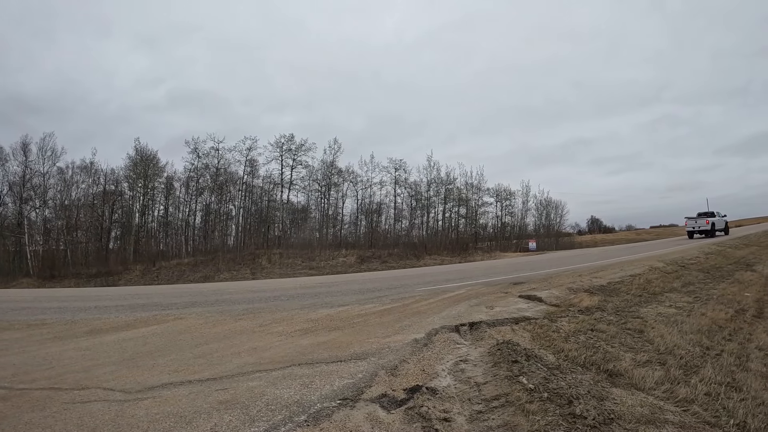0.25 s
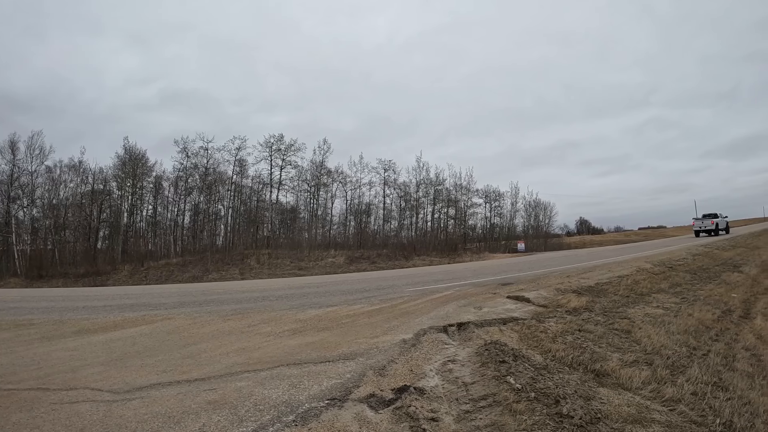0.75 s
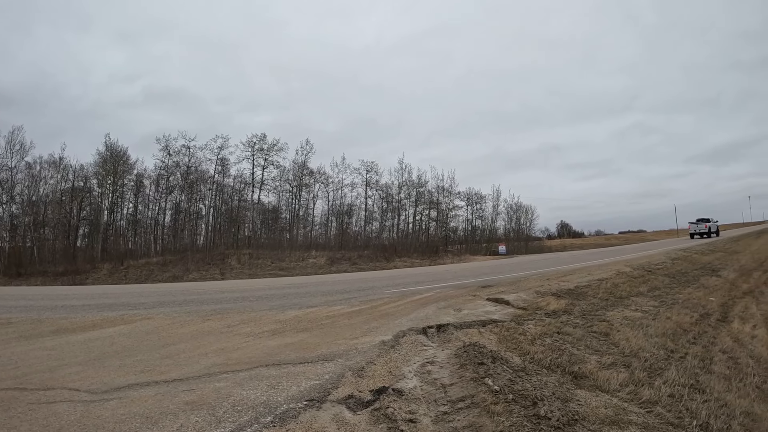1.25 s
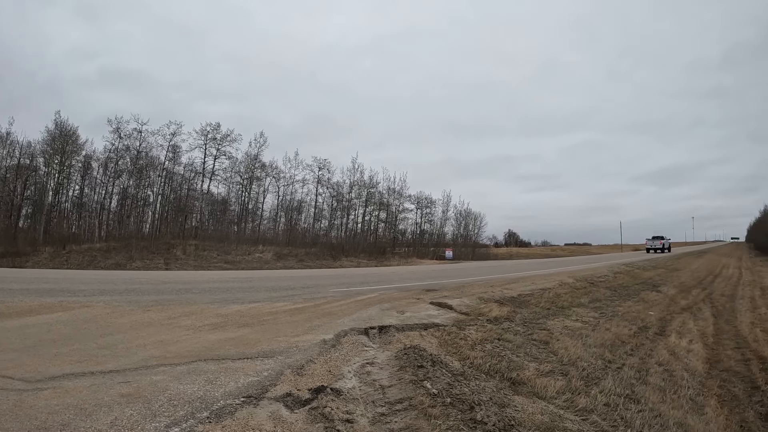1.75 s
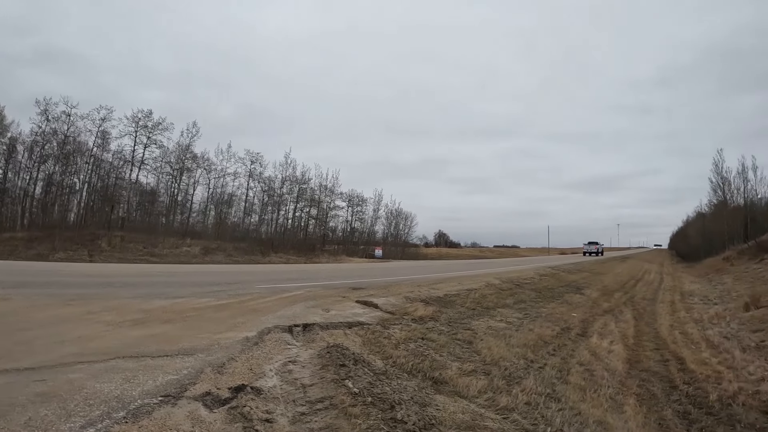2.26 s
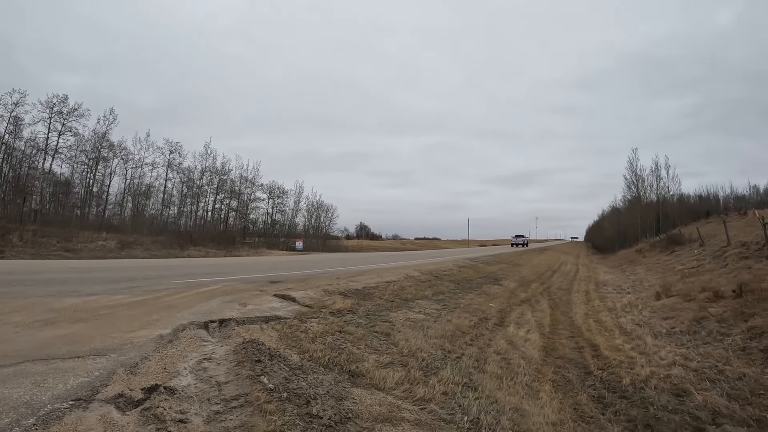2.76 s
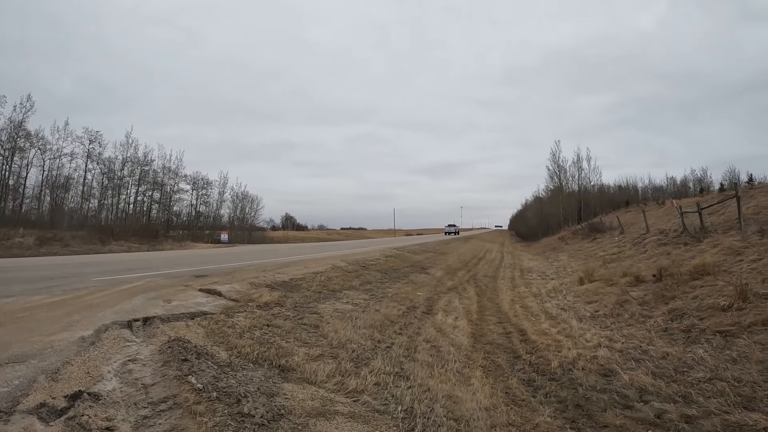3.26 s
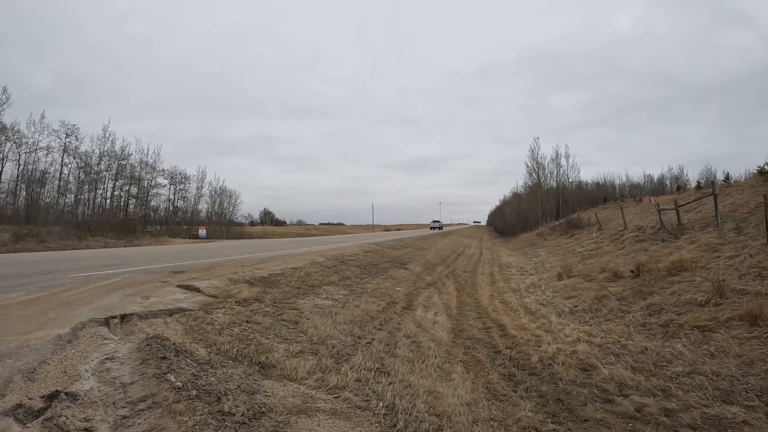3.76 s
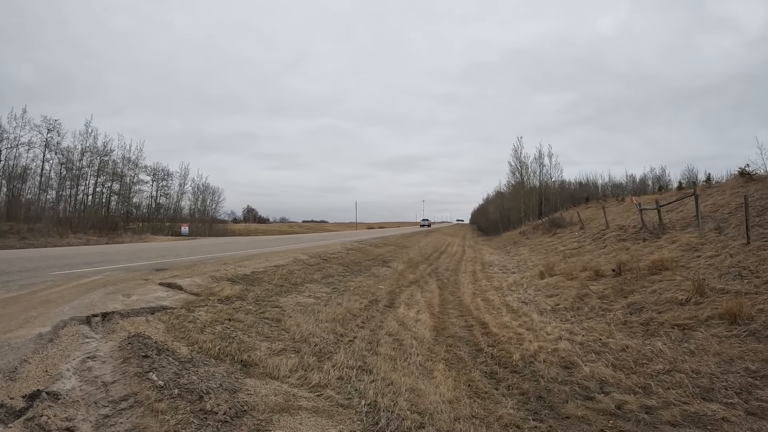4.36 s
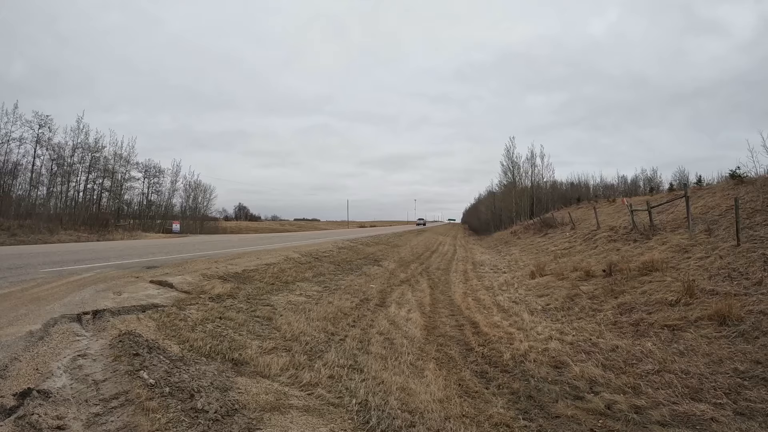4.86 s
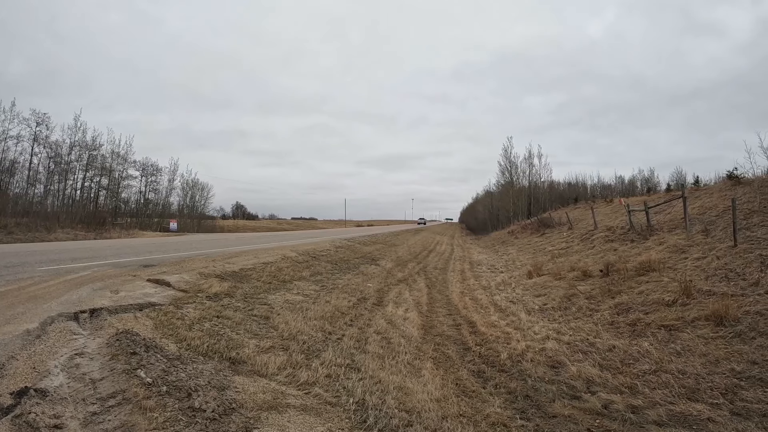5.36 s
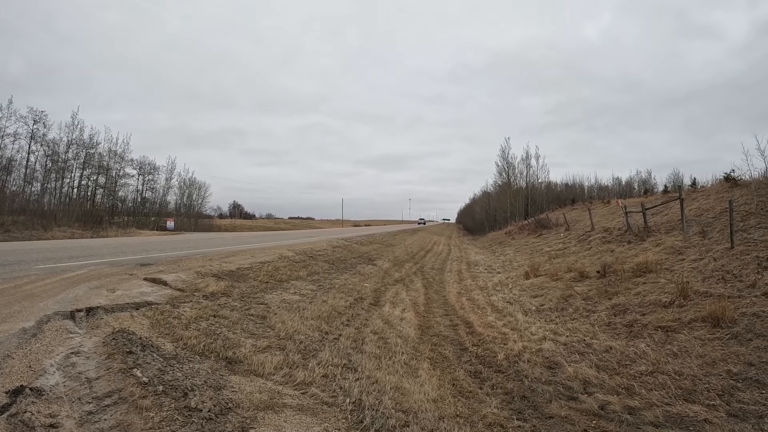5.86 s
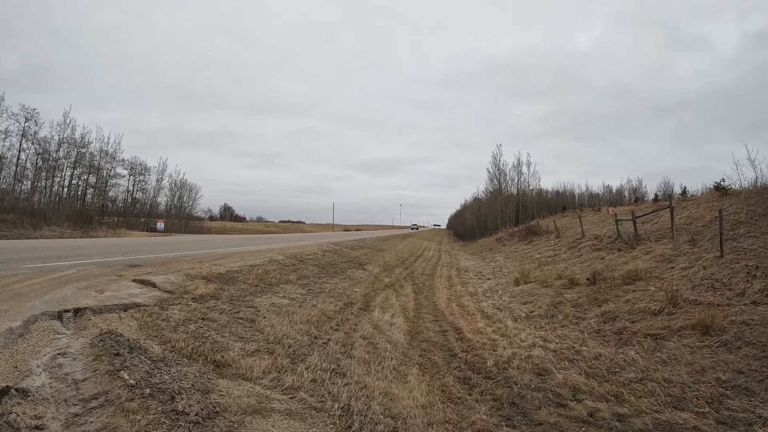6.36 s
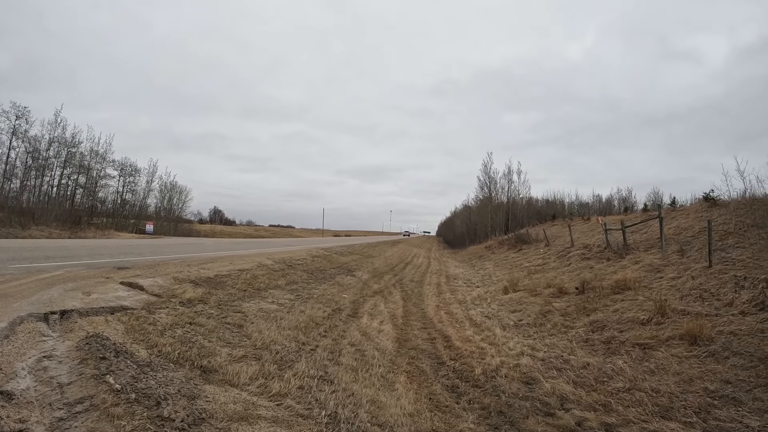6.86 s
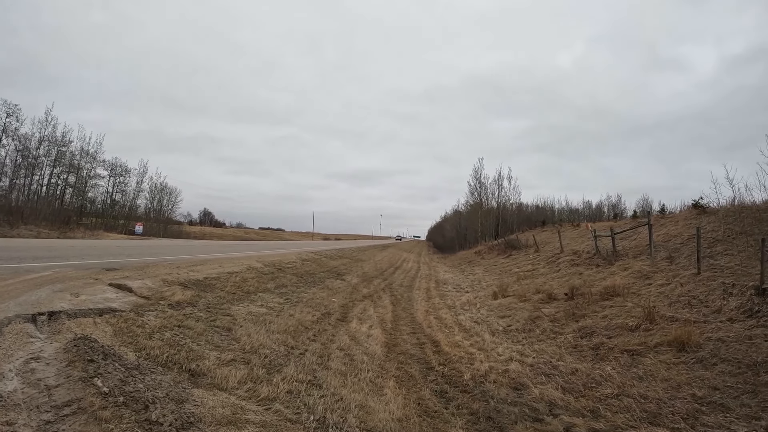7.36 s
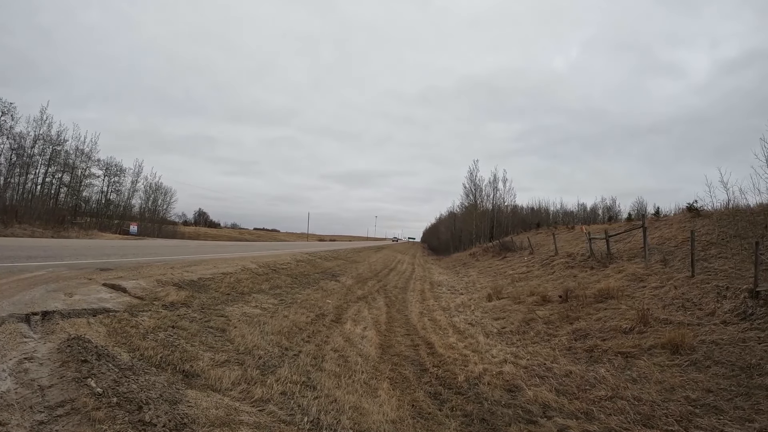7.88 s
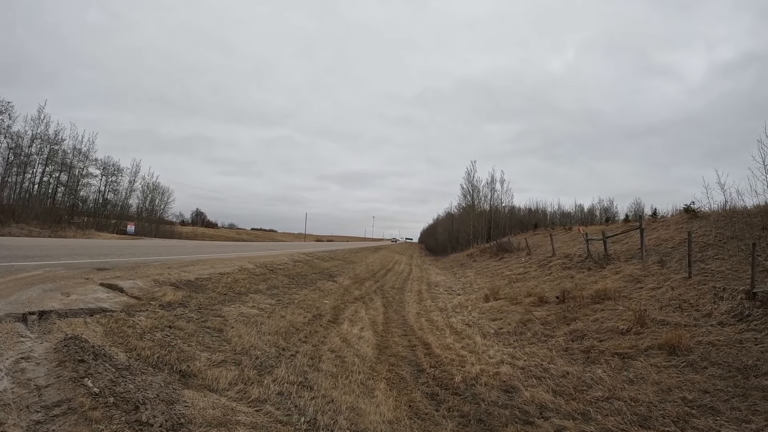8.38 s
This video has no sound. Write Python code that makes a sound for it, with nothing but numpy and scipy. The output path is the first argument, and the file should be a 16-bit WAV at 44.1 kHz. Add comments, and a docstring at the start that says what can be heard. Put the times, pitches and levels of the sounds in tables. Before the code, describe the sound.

A loud diesel pickup with an open exhaust booms and rasps away down a country road, shifting gear as wind buffets the microphone.

```python
"""A low boom and a rasp: a six-cylinder diesel pickup with an open exhaust pulls away on a country road.
Heard from the verge, it revs up, lifts off for a gear change and pulls again. The firings make the pipe
boom and burble, and each throws out a puff of rushing gas; under load some crack. The turbocharger
whistles and trees throw the sound back. Gusts buffet the microphone and something dry rustles close by."""
import sys
import numpy as np
from scipy import signal
from scipy.fft import rfft, irfft, next_fast_len
from scipy.io import wavfile
from scipy.ndimage import map_coordinates

SR = 44100
rng = np.random.default_rng(int(sys.argv[2]) if len(sys.argv) > 2 else 0)


def log_audio(samples):
    """Write samples as a 16-bit WAV file to the path given in sys.argv[1]."""
    # one column per channel
    frames = np.atleast_2d(samples).T
    # limit to full scale, then quantise
    limited = np.clip(frames, -1, 1)
    pcm = np.round(limited * 32767).astype(np.int16)
    wavfile.write(sys.argv[1], SR, pcm)


N = 380141
T = np.arange(N) / SR
FAR = np.clip(np.interp(T, [.3, 1.3, 2.7], [0, .08, 1]), 0, 1)  # the truck recedes: 0 close, 1 distant

# Single firings that crack out of the pipe. Each row: start in seconds, level in dB.
CRACKS = [(1.08, -27), (2.471, -26), (2.491, -28), (2.541, -27), (2.5505, -25), (2.57, -27), (2.589, -18),
          (2.5995, -22), (2.628, -23), (2.658, -23.5), (2.706, -28), (8.141, -29), (8.162, -28),
          (8.328, -28), (8.355, -28)]
# The tone of the exhaust's crackle. Each row: frequency in Hz, relative level in dB.
CRACKLE = [(900, -25.5), (1500, -5.5), (1800, -2), (2150, -4), (2500, -5.5), (3400, -11.5), (4100, -13.5),
           (5500, -26), (8000, -63)]


def amp(db):
    """Turns decibels into a gain to multiply by."""
    return np.exp(np.asarray(db) * (np.log(10) / 20))


def unit(x):
    """Scales a signal to an average (rms) level of 1."""
    return x / np.sqrt(np.mean(x ** 2) + 1e-20)


def curves(table):
    """Joins timed rows with straight lines: one curve for each column after the time."""
    times, *columns = np.transpose(table)
    return [np.interp(T, times, column) for column in columns]


def swell(centre, length):
    """A smooth rise and fall around a centre time, in seconds."""
    return np.cos(np.pi * np.clip((T - centre) / length, -.5, .5))


def wander(rate):
    """A smooth random curve of average size 1, changing about rate times a second."""
    knots = rng.standard_normal(4096)
    return np.interp(T, T[::64], unit(map_coordinates(knots, [T[::64] * rate], order=3, mode="wrap")))


def gain_at(spectrum, hz):
    """Looks up the gain at some frequencies in a table of Hz and dB."""
    table_hz, db = np.transpose(spectrum)
    return amp(np.interp(np.log(hz + 1), np.log(table_hz + 1), db))


def colour(x, spectrum):
    """Gives a signal the tone of a spectrum, falling away steeply past its top end."""
    size = next_fast_len(len(x) + 8192)
    hz = np.fft.rfftfreq(size, 1 / SR)
    gain = gain_at(spectrum, hz) / (1 + (hz / spectrum[-1][0]) ** 4)
    return irfft(rfft(x, size) * gain, size)[:len(x)]


def shimmer(x, depth_db, patch_hz=260, patch_s=.11):
    """Moving air lifts and drops random patches of the spectrum."""
    hz, times, bands = signal.stft(x, SR, nperseg=512)
    grid = np.meshgrid(hz / patch_hz, times / patch_s, indexing="ij")
    patches = unit(map_coordinates(rng.standard_normal((128, 128)), grid, order=3, mode="wrap"))
    return signal.istft(bands * unit(amp(depth_db * patches)), SR, nperseg=512)[1][:N]


def wind(breeze_db=-44, lump_db=1.6):
    """Gusts over a light breeze buffet the microphone with a low, lumpy rumble."""
    # Gusts. Each row: centre in seconds, length in seconds, level in dB.
    gusts = [(0.054, 0.43, -38.5), (1.66, 0.65, -36.5), (2.057, .18, -22.5), (2.502, .78, -39),
             (2.894, .27, -33.5), (5.42, 0.31, -36), (5.685, 0.39, -26.5), (5.962, 0.35, -26.5),
             (6.164, 0.3, -29), (6.47, .14, -32), (6.722, 0.53, -31), (6.982, 0.19, -30.5), (7.3, .6, -36),
             (7.763, 0.32, -23.5), (8.25, 0.88, -23.5), (8.58, .2, -35)]
    # The rumble's tone. Each row: frequency in Hz, relative level in dB.
    tone = [(5, -12), (20, -1.5), (45, 0), (80, -2.5), (130, -6), (200, -22), (400, -47.5), (1000, -64)]
    strength = amp(breeze_db) + sum(amp(db) * swell(s, length) for s, length, db in gusts)
    return strength * amp(lump_db * wander(19)) * unit(colour(rng.standard_normal(N), tone))


def bumps():
    """Dull bumps on the microphone: low noise that rises and dies quickly."""
    # Thuds. Each row: start in seconds, peak level in dB, rise time in seconds.
    thuds = [(5.755, -24, .01), (6.07, -32, .014), (6.99, -33, .01)]
    # Their tone. Each row: frequency in Hz, relative level in dB.
    tone = [(30, 5), (110, 5), (230, 0), (350, -7), (550, -17.5), (1200, -30)]
    out = np.zeros(N)
    for start, db, rise in thuds:
        age = np.maximum(T - start, 0) / rise
        out += amp(db) * age * np.exp(1 - age) * unit(colour(rng.standard_normal(N), tone))
    return out


def scuffs(decay_s=.003):
    """Dry scuffs within the rustle: bursts of noise that start at once and die fast."""
    # Bursts. Each row: start in seconds, peak level in dB.
    bursts = [(.21, -48), (.385, -50), (.957, -48), (1.03, -46), (1.057, -48), (1.091, -48), (1.586, -47),
              (1.728, -49), (2.007, -43), (2.139, -42), (2.16, -42), (2.372, -49)]
    # Their tone. Each row: frequency in Hz, relative level in dB.
    tone = [(2000, -19), (3500, 3.5), (4600, 5.5), (6700, -6), (8200, -17.5), (10500, -24), (15000, -35.5)]
    strength = sum(amp(db) * (T >= s) * np.exp(-abs(T - s) / decay_s) for s, db in bursts)
    return unit(colour(strength * rng.standard_normal(N), tone)) * np.sqrt(np.mean(strength ** 2))


def rustle(grains_per_s=800, grain_share=.65):
    """Something dry swishes close by: clumps of tiny clicks, a few of them large, over a fine hiss."""
    # Swishes. Each row: centre in seconds, length in seconds, level in dB.
    swishes = [(.03, .14, -51.5), (.255, .2, -54), (.41, .09, -56), (.745, .18, -56), (1.045, .22, -52.5),
               (1.22, .18, -53), (1.604, .13, -49), (1.777, .12, -50.5), (2.015, .13, -48.5),
               (2.145, .14, -48.5), (2.323, .12, -56.5)]
    # Their tone. Each row: frequency in Hz, relative level in dB.
    tone = [(1000, -20.5), (2000, -11.5), (2500, 3.5), (2950, -9), (3300, 2), (3620, 0.5), (3850, -3),
            (4300, -3), (4550, 4.5), (4800, 0.5), (5200, -4.5), (5600, -2), (6200, -11), (6750, -9.5),
            (7300, -14.5), (8200, -19.5), (10000, -28.5), (15000, -46)]
    sizes = amp(4 * np.minimum(rng.exponential(1, N), 4))
    grains = unit(sizes * rng.choice([-1, 1], N) * (rng.random(N) < grains_per_s / SR))
    texture = np.sqrt(grain_share) * grains + np.sqrt(1 - grain_share) * rng.standard_normal(N)
    clumps = amp(1.2 * wander(60))
    strength = sum(amp(db) * swell(s, length) for s, length, db in swishes)
    return strength * unit(shimmer(colour(texture * clumps, tone), depth_db=2.4)) + scuffs()


def tree_echo(x, fade_s=.83, onset_s=.0024, echoes_per_s=2000):
    """The edge of the wood scatters back many weak echoes, which fall by 60 dB in fade_s."""
    # The echoes' tone. Each row: frequency in Hz, relative level in dB.
    tone = [(50, 1.5), (200, 1), (1500, -4), (4000, -2), (9000, -14.5)]
    t = np.arange(SR) / SR
    echoes = rng.standard_normal(SR) * (rng.random(SR) < echoes_per_s / SR)
    tail = colour(echoes * amp(-60 * t / fade_s) * (1 - np.exp(-t / onset_s)), tone)
    return signal.fftconvolve(x, tail / np.linalg.norm(tail))[:N]


def resonate(x, hz, width):
    """Keeps a narrow band around hz: one resonance, applied twice for steep sides."""
    spin = np.exp(2j * np.pi * hz * T)
    decay = np.exp(-np.pi * width / SR)
    return 2 * (spin * signal.lfilter([(1 - decay) ** 2], [1, -2 * decay, decay ** 2], x / spin)).real


def whistles():
    """Rushing air sings in a narrow band for a short spell."""
    # Breathy turbocharger whistles. Each row: centre and length in seconds, pitch and width in Hz,
    # level in dB.
    turbo = [(0.036, 0.19, 3370, 330, -52), (0.315, 0.95, 3350, 220, -59.5), (2.74, 0.82, 3720, 452, -59),
             (3.0, 0.16, 3600, 545, -50.5), (3.06, .14, 2864, 300, -51), (3.18, 0.17, 4120, 800, -53.5),
             (3.42, 0.25, 3830, 493, -52), (5.37, 0.22, 5500, 1595, -68), (5.38, 0.13, 3034, 400, -55),
             (5.7, 1, 2930, 403, -62), (6.91, 0.16, 3910, 894, -65), (8.05, .1, 3460, 352, -53.5),
             (8.56, .13, 3455, 500.7, -51.5)]
    # Hollow hoots in the rush of gas, with the same columns.
    hoots = [(1.04, .6, 480, 260, -43), (1, .36, 980, 300, -44), (2.42, .25, 2170, 300, -51),
             (2.57, .32, 1200, 480, -42), (2.59, .24, 3500, 600, -47), (3.32, .34, 1800, 520, -45),
             (4.52, .8, 560, 220, -39.5), (6.58, .25, 2050, 450, -59), (6.87, .11, 2040, 400, -56),
             (8.21, .12, 1150, 260, -43), (8.36, .12, 1480, 220, -43.5), (8.44, .07, 1150, 220, -42)]
    return sum(amp(db) * swell(s, length) * unit(resonate(rng.standard_normal(N), hz, width))
               for s, length, hz, width, db in turbo + hoots)


def full_load():
    """How hard the engine is pushed, from 0 to 1."""
    # Spells when the puffs steepen into shocks. Each row: centre and length in seconds, peak from 0 to 1.
    spells = [(2.585, 0.62, 0.8), (3.3, 0.4, 0.4)]
    return np.clip(sum(peak * swell(s, length) for s, length, peak in spells), 0, .95)


def ragged(from_s=4.25, until_s=7, rise_s=.05, fall_s=.19):
    """How ragged the engine note is, from 0 to 1: its tones blur from high revs through the gear change."""
    return np.clip(np.minimum((T - from_s) / rise_s, (until_s - T) / fall_s), 0, 1)


def cracks(ring_hz=1900, decay_s=.0011, grit=.9):
    """A few firings snap louder than the rest: a sharp, gritty front rings the steel briefly."""
    out = np.zeros(N)
    age = np.arange(900) / SR
    for (start, db), detune in zip(CRACKS, rng.uniform(.8, 1.3, len(CRACKS))):
        front = np.sin(2 * np.pi * ring_hz * detune * age) + grit * rng.standard_normal(len(age))
        out[round(start * SR):][:len(age)] += amp(db) * front * np.exp(-age / decay_s)
    return colour(out, CRACKLE) / gain_at(CRACKLE, ring_hz)


def steel_pipe(gas):
    """The steel pipe rings in narrow bands over the rush of gas."""
    # Ringing bands. Each row: frequency in Hz, width in Hz, lift in dB.
    bands = [(1200, 750, 0.5), (1730, 200, 0), (2125, 270, 4), (2760, 170, 3), (3160, 200, 4.5),
             (3460, 300, 3), (4120, 200, -1)]
    rings = sum((amp(db) - 1) * signal.lfilter(*signal.iirpeak(hz, hz / width, fs=SR), gas)
                for hz, width, db in bands)
    return amp(-2) * (gas + rings)


def rasp(firings, firing_hz, bite_s=.018):
    """Each firing throws a puff of swirling gas; under load it starts with a shock."""
    # The rush of gas. Each row: time in seconds, then the levels in dB that roar and bark follow.
    rush_levels = [(0.0, -45, -45), (0.81, -47, -47.5), (0.96, -41.5, -45), (1.27, -42.5, -48),
                   (1.65, -45, -47.5), (2.05, -45.5, -46.5), (2.35, -38.5, -40), (2.57, -37, -42.5),
                   (2.85, -47, -43), (3.17, -41, -45.5), (3.19, -42, -44.5), (3.9, -38.5, -42),
                   (4.55, -42, -39.5), (4.9, -40.5, -36), (5.35, -49, -45), (5.79, -45.5, -45),
                   (6.7, -47.5, -50), (6.84, -39, -45), (7.03, -44, -47.5), (7.32, -44.5, -46),
                   (7.97, -39, -42.5), (8.02, -39, -40.5), (8.14, -37.5, -35), (8.62, -42.5, -37)]
    # The treble that crackle and fizz follow. Each row: time in seconds, level in dB.
    treble_levels = [(0.0, -50), (0.53, -55.5), (0.93, -52.5), (0.98, -50), (1.38, -53.5), (1.51, -52.5),
                     (1.58, -51.5), (1.94, -51), (2.01, -49), (2.33, -48.5), (2.47, -45), (2.6, -42.5),
                     (2.67, -45), (2.77, -49.5), (2.9, -52.5), (3.0, -47.5), (3.27, -43.5), (3.45, -41.5),
                     (3.58, -48.5), (4.56, -50), (4.87, -48.5), (5.23, -57), (5.86, -52.5), (6.17, -60.5),
                     (6.29, -54.5), (6.39, -60.5), (6.58, -57.5), (6.78, -61), (7.05, -57), (7.99, -50.5),
                     (8.06, -48), (8.62, -46)]
    # The treble jumps as the throttle bites. Each row: start and decay in seconds, lift in dB.
    surges = [(6.83, 0.11, 7.5), (8.1, 0.16, 4), (8.52, 0.14, 3.5)]
    # Tones of the hollow roar, the bark and the fizz. Each row: frequency in Hz, relative level in dB.
    roar_near = [(300, -4.5), (450, -13.5), (550, -11.5), (660, -7.5), (760, -2), (870, 3), (1000, -8),
                 (1600, -41.5)]  # soft ground cancels a band near 550 Hz while the truck is close
    roar_far = [(200, -29), (370, -2), (480, -5), (550, 0), (605, 2), (700, 0), (820, -2.5), (1000, -7.5),
                (1600, -42.5)]
    bark_near = [(600, -44.5), (820, -8), (920, -2), (1100, -1.5), (1300, -7), (1600, -12.5), (3000, -44.5)]
    bark_far = [(500, -34), (800, -6.5), (950, -2), (1150, 2), (1500, -4.5), (1900, -10), (3000, -38)]
    fizz_tone = [(2500, -22.5), (3800, -12), (4300, -3), (5200, -5.5), (6500, -11), (8000, -19),
                 (11000, -33.5), (15000, -54)]
    roar_db, bark_db, treble_db = curves(rush_levels) + curves(treble_levels)
    for start, decay, db in surges:
        treble_db += db * np.clip((T - start) / bite_s, 0, 1) * np.exp(-abs(T - start) / decay)
    size = amp(.7 * rng.standard_normal(2048)[firings.astype(int)])  # no two puffs are alike
    age = firings % 1  # runs from 0 to 1 between firings
    puffs = unit(size * np.exp(-age / .25))
    fronts = unit(size * np.exp(-age / .12) * (1 + .9 * rng.standard_normal(N)))
    load = full_load()

    def jet(tone, pulsing, shock=0):
        """Gas noise that pulses with the puffs, mixed with a share of sharp fronts."""
        gate = np.sqrt(np.maximum(1 - pulsing + pulsing * puffs ** 2, 0))
        gas = unit(colour(gate * rng.standard_normal(N), tone))
        return np.sqrt(1 - shock) * gas + np.sqrt(shock) * unit(colour(fronts, tone))

    near, far = np.sqrt(1 - FAR), np.sqrt(FAR)
    roar = near * jet(roar_near, .63) + far * jet(roar_far, .13)
    bark = near * jet(bark_near, .13) + far * jet(bark_far, .17, shock=load ** 2)
    crackle = jet(CRACKLE, .2, shock=load)
    fizz = jet(fizz_tone, .19)
    fizz_db = -14.5 + .81 * treble_db - 6.5 * load  # shocks add much more to the crackle than to the fizz
    fizz_db -= 1.91 * T  # the air absorbs the finest hiss as the truck recedes
    fizz_db += .0456 * np.maximum(firing_hz - 117, 0)  # the gas hisses harder at high revs
    return (amp(1.7 + .97 * roar_db) * roar + amp(.7 + .99 * bark_db) * bark
            + amp(2.3 + .99 * treble_db) * crackle + amp(fizz_db) * fizz)


def order_tone(cycle, order, fade_db, sway, lag=0., sway_rate=8):
    """An order is a tone with that many waves per engine cycle. Moving air makes it fade and sway."""
    offset = rng.random() * (order % 3 > 0) - lag * order  # every third keeps step with the cylinder groups
    level = np.sqrt(2) * amp(fade_db * wander(3.998))
    return level * np.cos(2 * np.pi * (order * cycle + offset) + sway * wander(sway_rate))


def burble(cycle, firing_hz, boom_db, burble_db, smear_hz=340):
    """Unequal cylinders make a slow throb and a ladder of tones; uneven combustion fills the gaps."""
    # Tones of the low throb and of the ladder above it. Each row: order, relative level in dB.
    throb_orders = [(3, -35.5), (4, -28), (5, -25.5), (7, -22.5), (8, -14.5), (10, -14), (11, -17.5)]
    ladder_orders = [(13, -5), (14, -18.5), (15, -3.5), (16, -7.5), (17, -8), (18, -2.5), (19, -12.5),
                     (20, -18), (21, -4), (22, -8), (23, -11.5), (24, -6), (25, -9), (26, -15.5),
                     (27, -9.5), (28, -23.5), (29, -16.5), (30, -9.5), (31, -17.5), (32, -19.5),
                     (33, -15.5), (34, -12.5), (36, -10)]
    # The pipe's resonances, from close and from afar. Each row: frequency in Hz, relative level in dB.
    pipe_near = [(60, -14), (150, 7), (230, 3.5), (305, 6.5), (370, -5.5), (450, -1.5), (560, -26),
                 (900, -38.5)]
    pipe_far = [(60, -20.5), (150, 2.5), (235, 3.5), (305, -5.5), (370, -7.5), (450, -12), (560, -13.5),
                (900, -34)]
    throb = sum(amp(db) * order_tone(cycle, round(order), fade_db=3.5, sway=.39)
                for order, db in throb_orders)
    throb_db = 3.1 + .17 * boom_db + .69 * burble_db
    throb_db -= .35 * np.maximum(firing_hz - 121, 0)  # it smooths out at high revs
    # Each order swells as the revs carry it through a resonance of the pipe.
    orders, order_db = np.transpose(ladder_orders)
    hz = np.round(orders)[:, None] * firing_hz[::256] / 6
    far, blur = FAR[::256], ragged()
    gains = amp(order_db[:, None]) * ((1 - far) * gain_at(pipe_near, hz) + far * gain_at(pipe_far, hz))
    gains /= np.linalg.norm(gains, axis=0)
    # High orders lose their pitch from afar, in the swirling air, and while the note is ragged.
    smear = (FAR + .6 * blur) * (firing_hz / 6 / smear_hz) ** 2
    ladder = np.zeros(N)
    for order, gain in zip(orders, gains):
        sway = .25 + smear * order ** 2
        tone = order_tone(cycle, round(order), fade_db=2, sway=sway, lag=.015, sway_rate=45)
        ladder += np.interp(T, T[::256], gain) * tone
    puffs = np.exp(-2 * (6 * cycle % 1))
    uneven = unit(colour(puffs * rng.standard_normal(N), pipe_far))
    uneven_db = -10.5 * (1 - FAR) - 11 * FAR + 7 * blur
    upper = amp(-2.5 - 5.5 * blur) * ladder + amp(uneven_db) * uneven
    return amp(throb_db) * throb + amp(burble_db) * upper


def boom(cycle, boom_db, burble_db):
    """The pipe's low notes: the firing rate, its octave and a fifth from unequal cylinder groups."""
    # The fifth fades at high revs, just before the lift and as the next gear bites.
    # Each row: centre in seconds, length in seconds, change in dB.
    fifth_lulls = [(4.206, 0.41, -2.5), (5.14, 0.46, -13.5), (6.799, .4, -5)]
    # One order swells briefly in the pipe. Each row: centre and length in seconds, order, level in dB.
    drones = [(0.58, 0.68, 9, -25), (0.641, .65, 18, -38.5), (0.69, 0.86, 23, -35), (0.978, 0.29, 25, -32),
              (0.97, 0.37, 28, -37), (1.168, 0.35, 22, -32), (1.303, 0.6, 19, -39.5), (1.65, .7, 21, -32),
              (2.095, 0.66, 21, -38), (2.201, 0.52, 19, -36), (1.773, 0.48, 12, -24.5),
              (2.074, 0.41, 9, -24.5), (2.547, .26, 18, -33), (2.5, 0.18, 36, -41), (2.589, 0.58, 12, -28),
              (2.972, 0.68, 9, -28.5), (3.221, 0.66, 3, -34.5), (4.542, 1.3, 3, -41.5),
              (3.595, 0.91, 15, -40), (4.499, 0.59, 15, -42), (4.598, 0.41, 9, -40),
              (5.374, 0.37, 5, -29.5), (5.348, 0.27, 8, -35.5), (5.33, .24, 3, -36), (5.428, .26, 9, -46),
              (5.624, .2, 9, -30.5), (5.694, 0.41, 5, -30.5), (6.115, .26, 9, -37),
              (6.547, 0.62, 12, -38.5), (6.858, 0.27, 12, -32), (6.932, 0.36, 15, -42), (7.1, .4, 9, -37),
              (7.99, 0.34, 12, -38), (8.033, 0.19, 36, -38.5), (8.29, 0.37, 18, -42.5),
              (2.22, 0.44, 28, -44)]
    blur = ragged()
    phase = 2 * np.pi * 6 * cycle + .13 * blur * wander(30)
    octave_db = 9.93 + .45 * boom_db + 1.043 * burble_db - 8 * blur
    fifth_db = -10.5 + .18 * boom_db + .53 * burble_db
    fifth_db -= 10.5 * full_load()  # at full load the cylinders even out
    fifth_db += sum(db * swell(s, length) for s, length, db in fifth_lulls)
    notes = np.sqrt(2) * (amp(boom_db) * np.cos(phase) + amp(octave_db) * np.sin(2 * phase))
    fifth = order_tone(cycle, 9, fade_db=2.5, sway=.1 + .2 * blur, lag=.0035, sway_rate=30)
    notes += amp(fifth_db) * fifth
    shaky = cycle + .00084 * wander(35)  # uneven rotation blurs the high orders most
    for centre, length, order, db in drones:
        tone = order_tone(shaky, round(order), fade_db=.5, sway=.085 + .22 * blur, lag=.0079, sway_rate=20)
        notes += amp(db) * swell(centre, length) * tone
    return notes


def truck(puff_lead=.25):
    """Six firings make one four-stroke cycle; boom, burble and rasp all follow that one rotation."""
    # Engine speed sags as the gear takes up, climbs, drops through the shift and climbs again.
    # Each row: time in seconds, firings per second.
    revs = [(0, 93.2), (.3, 82.4), (.48, 76.93), (1.1, 80.82), (1.8, 88.64), (2.4, 97.6), (2.8, 108.5),
            (3.5, 121.7), (4, 133.1), (4.72, 145.2), (4.92, 142.1), (5.23, 146.5), (5.6, 124.6), (5.8, 115),
            (6, 103.4), (6.35, 93.56), (6.72, 93.66), (6.85, 97.8), (7.02, 95.05), (7.8, 98.4),
            (8.62, 107.2)]
    # The boom, and the burble that dies away with distance. Each row: time in seconds, level in dB.
    boom_levels = [(0, -30.5), (.3, -30.5), (.37, -26), (.97, -19), (1.28, -22), (1.5, -28.5), (1.8, -23.5),
                   (2.1, -23), (2.4, -14), (2.6, -14), (2.88, -19.5), (3.55, -12.5), (4.2, -14),
                   (4.78, -20.5), (5.08, -29), (5.24, -28), (5.3, -37), (5.5, -38), (5.6, -31.5),
                   (5.8, -24), (5.94, -34), (6.2, -39), (6.33, -30.5), (6.87, -16.5), (7.05, -25.5),
                   (7.5, -23), (8, -18), (8.62, -21)]
    burble_levels = [(0, -32), (.3, -35), (.45, -29), (.8, -26.5), (.98, -24.5), (1.5, -26), (2.3, -30.5),
                     (2.65, -30), (3, -32), (4.1, -35.5), (4.7, -35), (4.95, -38.5), (5.25, -39.5),
                     (5.32, -40), (6.2, -45), (6.87, -37), (7.7, -46), (8.25, -39), (8.62, -41.5)]
    firing_hz, boom_db, burble_db = curves(revs) + curves(boom_levels) + curves(burble_levels)
    firings = np.cumsum(firing_hz * (1 + .003 * wander(25))) / SR
    loudest_s = max(CRACKS, key=lambda crack: crack[1])[0]
    firings -= (np.interp(loudest_s, T, firings) + puff_lead) % 1  # a puff starts on the loudest crack
    cycle = firings / 6
    rough = burble(cycle, firing_hz, boom_db, burble_db)
    rough += shimmer(steel_pipe(rasp(firings + puff_lead, firing_hz)), depth_db=1.4)
    echo_db = -16 * (1 - FAR) - 14 * FAR  # the farther the truck, the more comes back from the trees
    return boom(cycle, boom_db, burble_db) + amp(-2.5) * rough + amp(echo_db) * tree_echo(rough)


def scene():
    """The truck, the sounds around the microphone and a very faint hiss, in one channel."""
    mix = truck() + cracks() + whistles() + wind() + rustle() + bumps()
    return (mix + amp(-100) * rng.standard_normal(N))[None]


def record(dry, fade_s=.004, top_hz=15600):
    """Fades both ends and cuts off the highest treble."""
    ends = np.clip(np.minimum(T, T[-1] - T) / fade_s, 0, 1)
    low_pass = signal.firwin(511, top_hz, window=("kaiser", 9), fs=SR)
    return signal.oaconvolve(dry * ends, low_pass[None], "same")


dry = scene()
out = record(dry)
log_audio(out)
```